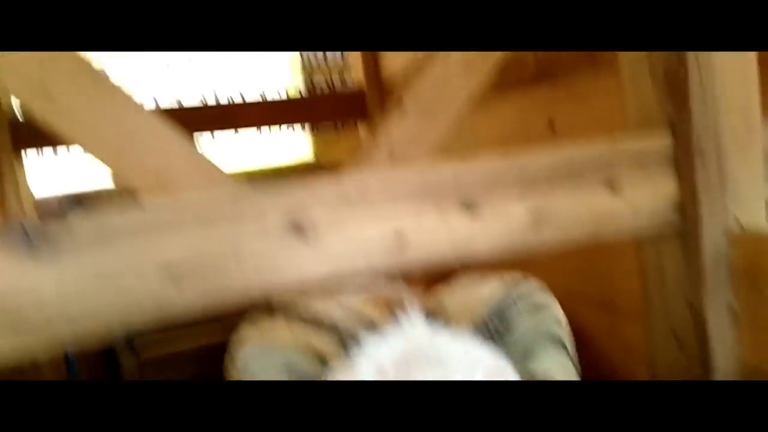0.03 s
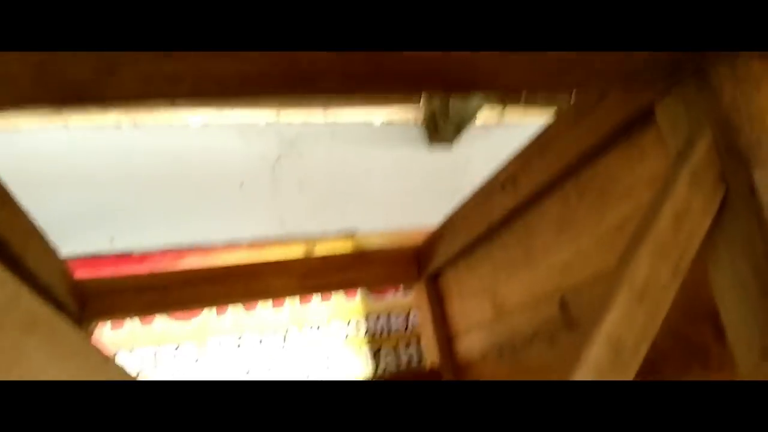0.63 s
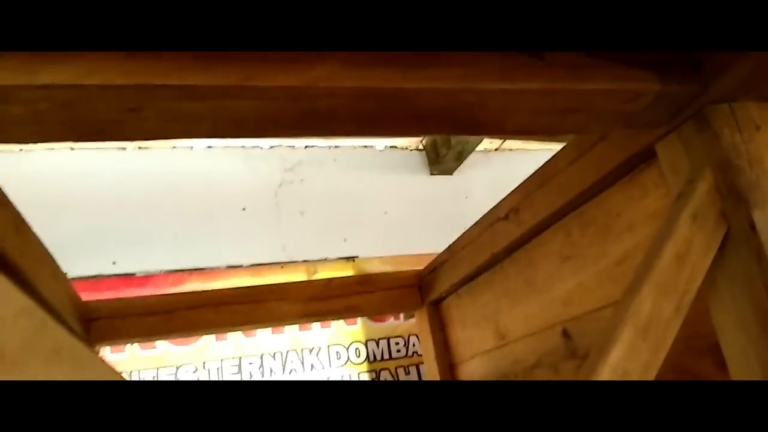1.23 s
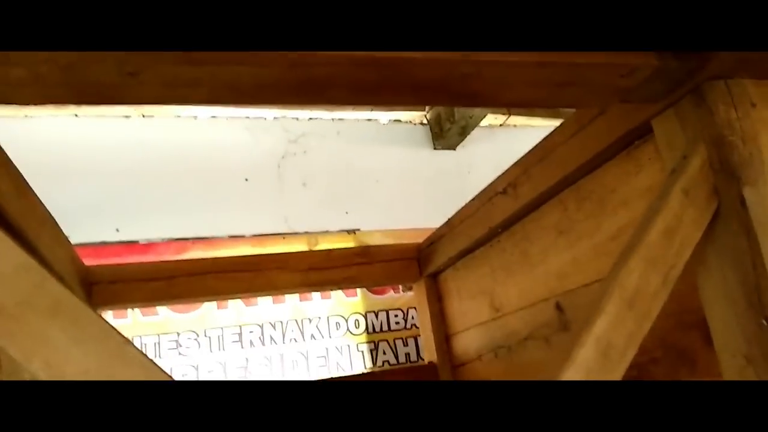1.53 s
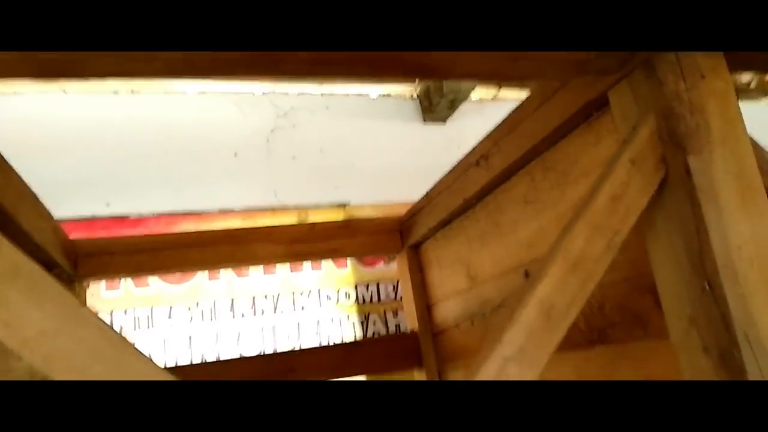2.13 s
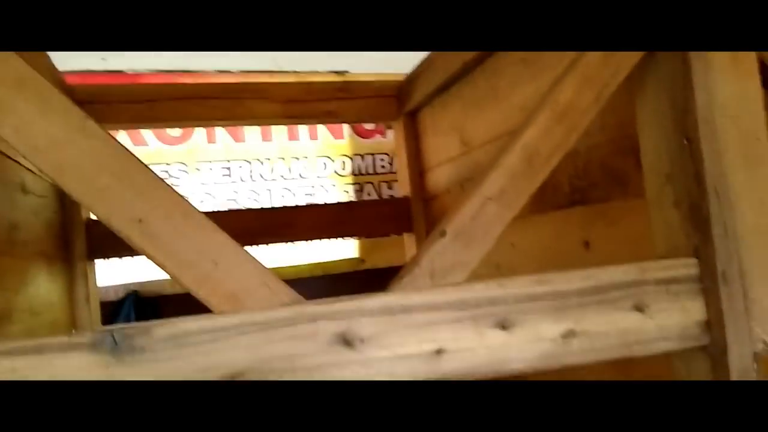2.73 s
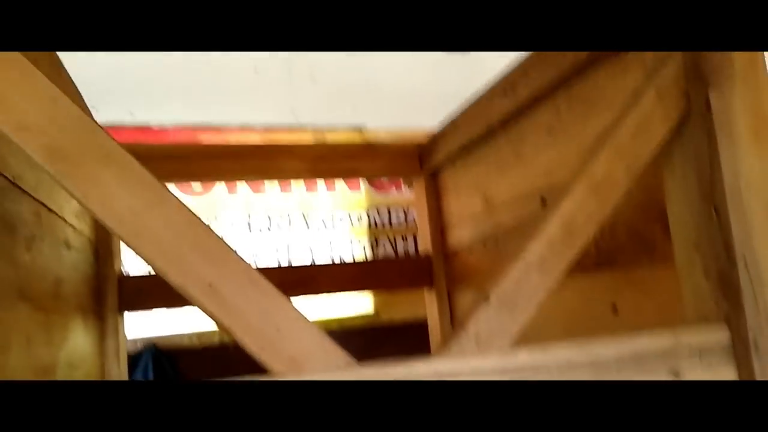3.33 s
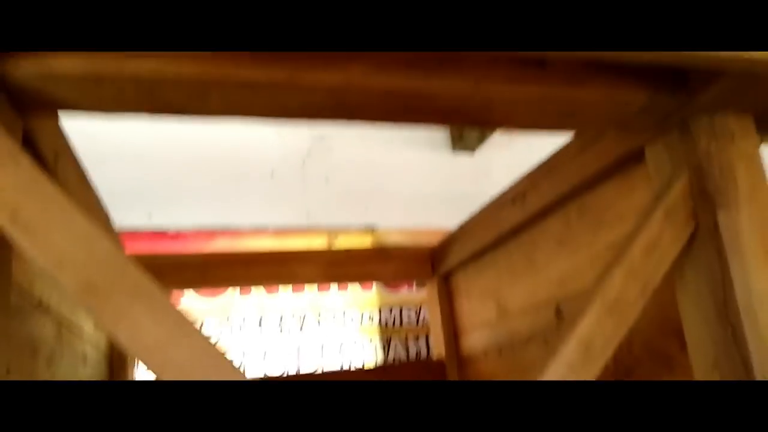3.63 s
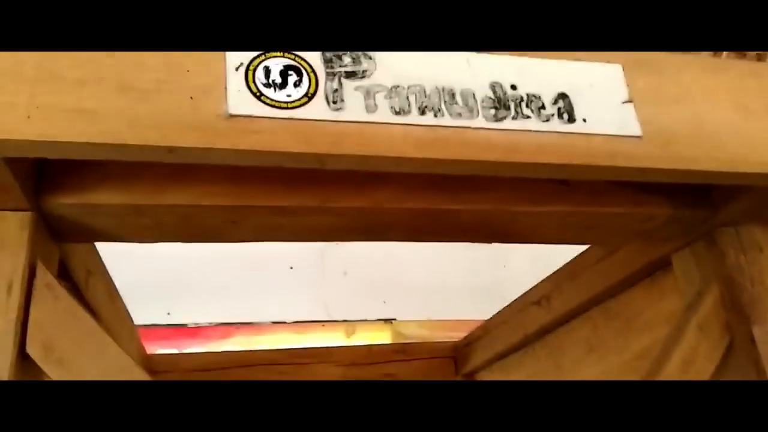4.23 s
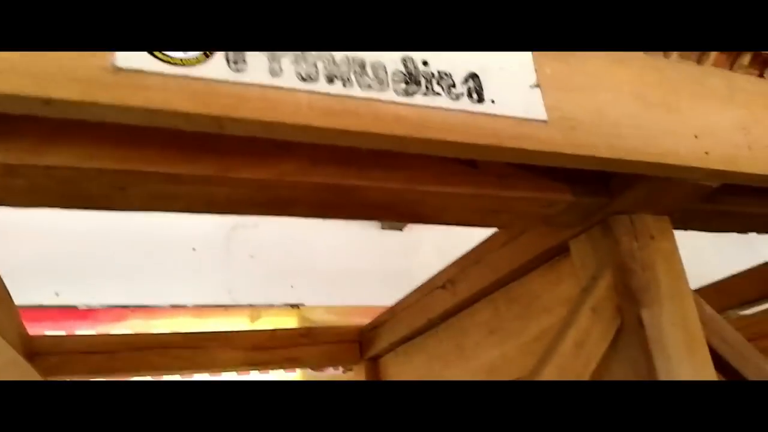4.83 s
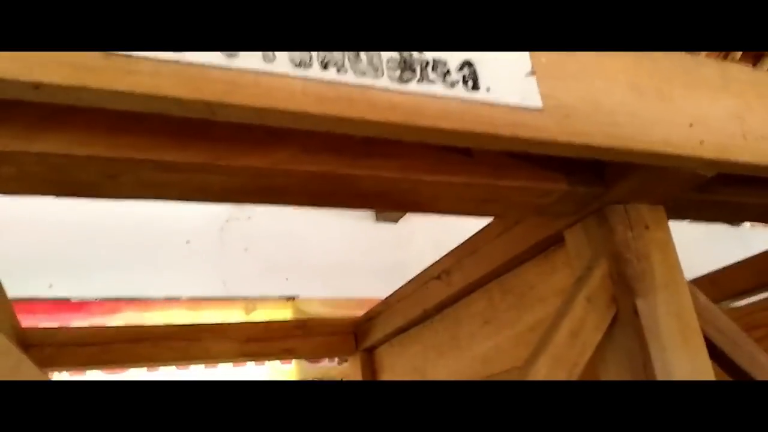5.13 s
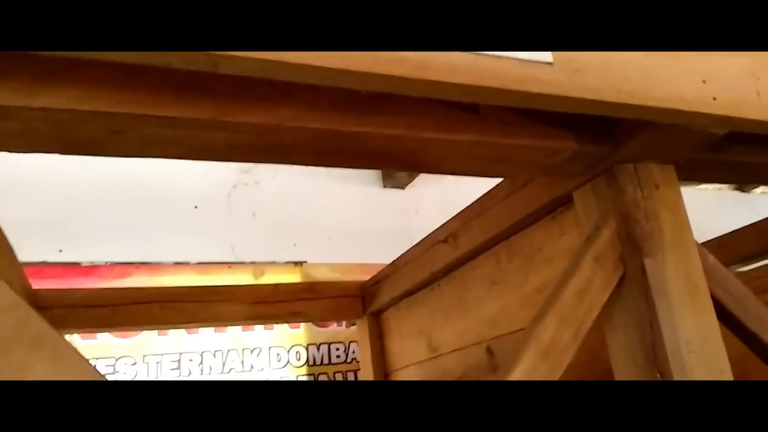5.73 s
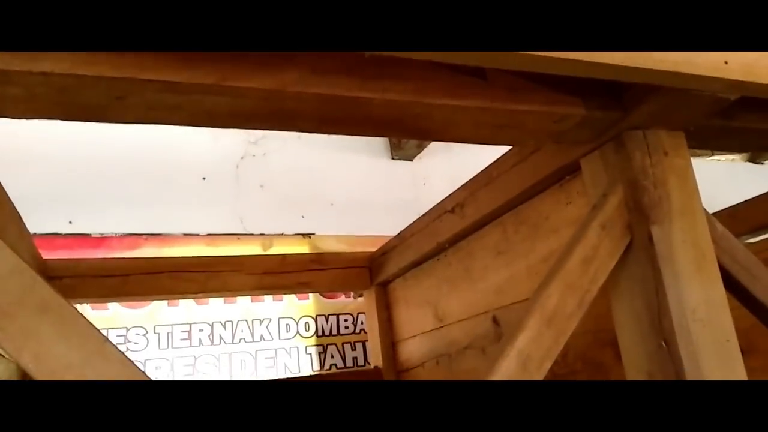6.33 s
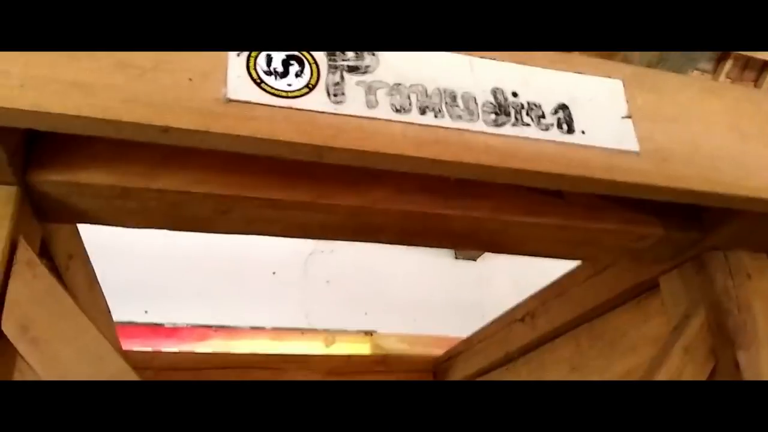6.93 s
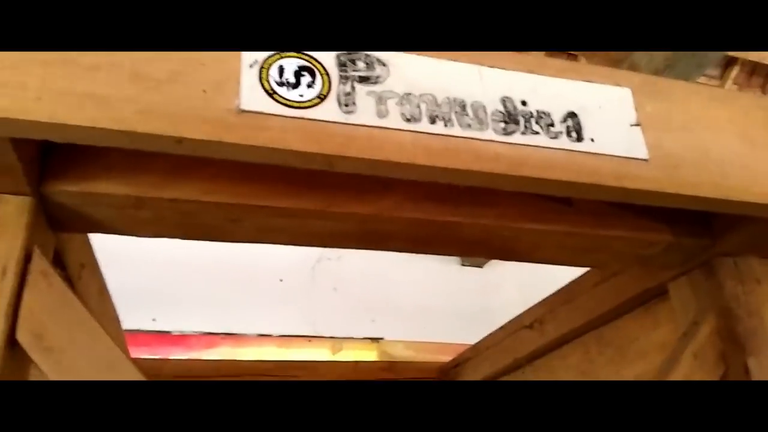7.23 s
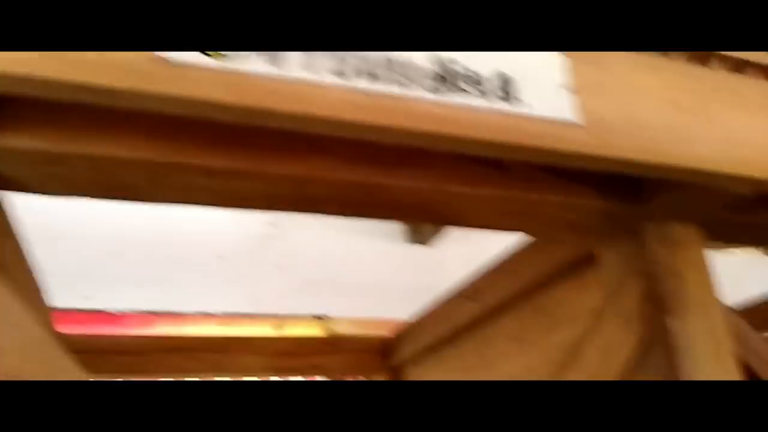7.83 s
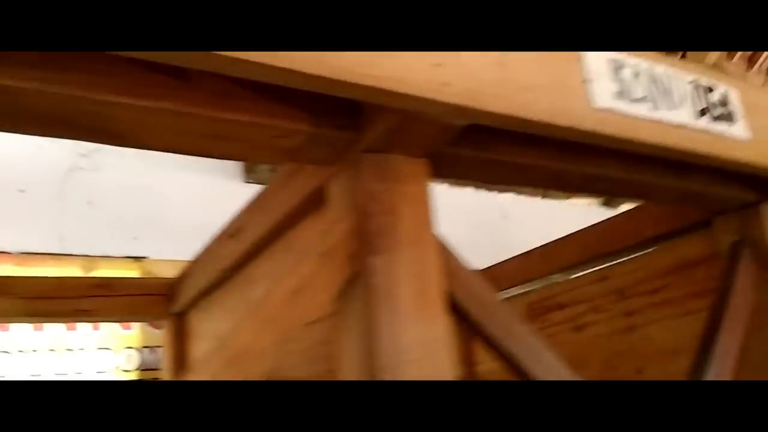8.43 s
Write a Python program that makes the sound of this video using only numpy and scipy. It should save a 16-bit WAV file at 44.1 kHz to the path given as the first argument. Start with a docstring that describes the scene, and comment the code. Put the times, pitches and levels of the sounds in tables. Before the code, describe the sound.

Dull, booming knocks ring through a wooden shed as a sheep strikes the boards of its pen close by, the loudest slightly distorted. The blows give way to softer body bumps and floor scuffs while far tyre noise and a thin shrill band swell over a steady hiss and low engine hum. After a half-second of silence near the end come more scuffs, four quick ticks and one lighter knock.

```python
"""A sheep in a wooden shed butts the plank walls of its pen at once, over far traffic, one low engine
drone and a bright, steady hiss. More blows follow in the first four seconds, the hardest overloading the
microphone; between them its flank bumps the boards and it scuffs about on the floor. Tyre rush and a thin
shrill band swell while the bumps and scuffs go on. Near 6.8 s the sound drops out for about half a second;
then come a few scuffs, four sharp ticks and a last knock."""
import sys
import numpy as np
from scipy import signal
from scipy.io import wavfile

SR = 44100
rng = np.random.default_rng(int(sys.argv[2]) if len(sys.argv) > 2 else 0)


def generate_wav(sig):
    """Save sig (samples, or channels by samples) to the path in sys.argv[1] as 16-bit PCM at SR."""
    pcm = np.round(np.clip(np.atleast_2d(sig).T, -1, 1) * 32767).astype(np.int16)
    wavfile.write(sys.argv[1], SR, pcm)


N = 378378
TIME = np.arange(N) / SR


# hard knocks of head and hoof on the pen: (time [s], level [dB], contact cutoff [Hz],
# board note [Hz], relative note level [dB], bass gain [dB])
KNOCKS = [(0.000, -4.5, 1100, 407, 5, 5), (1.241, 0, 1650, 400, -1.5, 0.5),
          (2.014, -26, 4550, 1200, 0, -10), (2.069, -21, 1000, 222, 3, 6),
          (2.276, -19, 2110, 908, 13.5, -0.5), (2.322, -11, 1510, 635, 2, 4),
          (2.419, -2.5, 1600, 578, -1.5, 6.5), (2.431, -2, 2115, 199.2, -6, -1.5),
          (3.546, 0, 1650, 349, 0.5, 3), (4.318, -14.5, 1690, 128, 0, -5),
          (8.156, -12.5, 1080, 440, 4.5, -4), (8.160, -16.5, 1000, 267, 8, -1)]
# soft bumps of the flank: (time [s], level [dB], board note [Hz])
BUMPS = [(0.203, -18, 127), (1.035, -24, 286), (1.203, -14.5, 327), (1.598, -23, 118), (3.385, -21, 135.7),
         (4.289, -20, 186), (4.775, -21.5, 117.6), (4.907, -27.5, 104.6), (5.091, -26.5, 86),
         (6.028, -22, 105), (7.373, -25, 124)]
def blows(boom_db=-1.5, crack_db=3.5, bass_hz=220, give_share=.45, give_s=.02):
    """Impact excitation: a blow rings board, pen and shed; the softer the contact, the less treble."""
    out, t = np.zeros(N), TIME[:SR]
    # fleece cushions a bump: low cutoff, more bass, and mostly the note of the one board it touches
    contacts = KNOCKS + [(s, db, 382, note_hz, 7.5, 4.5) for s, db, note_hz in BUMPS]
    for contact, boom in zip(contacts, shed_booms(t, len(contacts))):
        s, level_db, cutoff_hz, note_hz, note_db, bass_db = contact
        force = from_db(level_db)
        # a lighter blow wakes less of the whole pen, and its crack stands out more
        pen = from_db(.28 * level_db) * pen_ring(t)
        crack = from_db(crack_db - .16 * level_db) * plank_crack(t)
        body = butter(from_db(boom_db) * boom + pen + crack, cutoff_hz, "low", order=3)
        body += (from_db(bass_db) - 1) * butter(body, bass_hz, "low", order=1)
        board = from_db(note_db) * struck_board(t, note_hz, force)
        give = 1 - give_share * force * np.exp(-t / give_s)   # the wall yields, holding back the onset
        add(out, s, force * give * (body - board))
    return out


def struck_board(t, hz, force, full_force_cycles=135, overtone_ratio=1.5, overtone_db=-15.5):
    """Damped free vibration: a note and an inharmonic overtone ring longer after a harder blow."""
    t60 = full_force_cycles * force ** .55 / hz
    phase = 2 * np.pi * hz * t
    tone = np.sin(phase) + from_db(overtone_db) * np.sin(overtone_ratio * phase)
    return tone * build_up(t, hz, cycles=1) * fade(t, t60)


def plank_crack(t):
    """Impact transient: the plank strikes its frame in a brief burst of band-limited noise."""
    burst = resonance(rng.standard_normal(len(t)), hz=750, width_hz=700)
    return rms_one(burst) * fade(t, t60=.035)


# modes of the plank walls and frame: (frequency [Hz], relative level [dB], decay time T60 [s])
PEN_MODES = [(70.3, -19, 0.72), (86.2, -21, 0.95), (110.7, -23.5, 0.37), (119.4, -14, 0.94),
             (136.8, -13.5, 0.9), (198.7, -19.5, 0.76), (213, -19.5, 0.94), (236, -19.5, 0.75),
             (287.7, -18, .6), (345.6, -14.5, 0.68), (374.3, -5.5, 0.31), (402.4, -9.5, 0.67),
             (426.8, -2.5, 0.26), (534, -9.5, 0.26), (567, -14.5, 0.6), (718, -12, .4), (843, -6.5, 0.21),
             (992, -12.5, 0.47), (1122, -16.5, 0.62), (1426, -14.5, .33)]
def pen_ring(t, scatter_db=.5):
    """Modal superposition: the pen rings as a sum of damped sines, weighted a little anew each blow."""
    hz, level_db, t60 = np.array(PEN_MODES).T[:, :, None]
    modes = from_db(level_db) * np.sin(2 * np.pi * hz * t) * build_up(t, hz) * fade(t, t60)
    signs = (-1) ** np.arange(len(modes))
    weights = signs * from_db(scatter_db * rng.standard_normal(len(modes)))
    return weights @ modes


# dense ring of boards and shed: (frequency [Hz], relative spectral density [dB])
BOOM_SPECTRUM = [(30, -20), (60, -15.5), (120, 3.5), (170, -5), (260, -3.5), (400, -4), (650, -4),
                 (1000, -7), (1700, -12.5), (3000, -10.5), (6000, -12), (12000, -25.5)]
# reverberation of the shed: (frequency [Hz], decay time T60 [s])
SHED_DECAY = [(60, 1.5), (160, 0.44), (420, 1.03), (1100, 0.48), (2900, 0.37), (12000, 0.29)]
def shed_booms(t, count, board_t60=.37, tail_db=-5):
    """Modal overlap: dense modes merge into decaying noise, in which the shed outlasts the boards."""
    centres, bands = noise_bands(BOOM_SPECTRUM)
    hz = centres[:, None]
    tail = from_db(tail_db) * fade(t, at_hz(SHED_DECAY, hz))
    envelopes = build_up(t, hz) * (fade(t, board_t60) + tail)
    for _ in range(count):
        start = rng.integers(0, N - len(t))
        yield (bands[:, start:start + len(t)] * envelopes).sum(0)


# hoof and fleece scuffs: (time [s], level [dB], upper edge of the rasp [Hz])
SCUFFS = [(0.438, -26.5, 4250), (1.79, -34.5, 13100), (2.012, -24.5, 5200), (2.067, -22.5, 4500),
          (2.327, -25.5, 3500), (2.424, -23.5, 14000), (2.857, -27, 5760), (3.549, -31.5, 11080),
          (4.06, -29, 2500), (4.308, -26, 2470), (4.567, -32, 2190), (5.394, -26.5, 3600),
          (5.849, -36, 2400), (6.375, -28.5, 2260), (6.536, -33.5, 2980), (7.41, -30, 2700),
          (7.62, -31.5, 3300), (7.86, -32, 3620)]
def scuffs(slips_per_s=1200, rise_s=.0015, slide_s=.048, low_hz=1350, floor_db=-4.5, room_db=-1):
    """Stick-slip friction: a slide is a burst of tiny slips on the floorboards, smeared by the shed."""
    out, t = np.zeros(N), TIME[:SR // 2]
    for s, level_db, top_hz in SCUFFS:
        slipping = rng.random(len(t)) < slips_per_s / SR
        slips = rms_one(slipping * rng.standard_normal(len(t)))
        stroke = slips * (1 - np.exp(-t / rise_s)) * np.exp(-(t / slide_s) ** 2)
        rasp = butter(stroke, [low_hz, top_hz], "band", order=3)
        rasp = butter(rasp, np.sqrt(low_hz * top_hz), "low", order=1)
        floorboards = from_db(floor_db) * resonance(stroke, hz=850, width_hz=600)
        direct = rasp - floorboards
        echoes = rng.standard_normal(len(t)) * fade(t, t60=.35)
        reverb = signal.fftconvolve(direct, echoes / np.linalg.norm(echoes))[:len(t)]
        heard = direct + from_db(room_db) * reverb
        add(out, s, from_db(level_db) * heard / np.std(heard[:round(slide_s * SR)]))
    return out


# small sharp ticks by the microphone: (time [s], relative level [dB])
TICKS = [(7.8618, -23), (7.8732, -21), (7.8843, -28), (7.8917, -22)]
def ticks():
    """Heavy damping: tiny contacts excite a bright resonance that dies within milliseconds."""
    out, t = np.zeros(N), TIME[:SR // 20]
    for s, level_db in TICKS:
        contact = rng.standard_normal(len(t)) * fade(t, t60=.0072)
        tick = resonance(contact, hz=9200, width_hz=2500)
        add(out, s, 2 * from_db(level_db) * tick / np.abs(tick).max())
    return out


# distant engine: (time [s], firing rate [Hz], level [dB])
ENGINE = [(0, 68.1, -36), (1.5, 66, -42.5), (2.0, 72.15, -30), (2.7, 76.2, -30), (3.25, 69, -34),
          (3.8, 69.95, -30), (4.4, 73.7, -28), (5.4, 80.7, -40), (5.72, 83.1, -27), (6.45, 85.4, -34.5),
          (6.75, 88, -30), (7.4, 71.74, -38), (8.58, 71, -41)]
def engine(wobble=.011, waver_db=1.2, octave_db=-15.5):
    """Periodic excitation: the firing rate sets a wavering fundamental and its second harmonic."""
    firing_hz, level_db = in_time(ENGINE)
    phase = 2 * np.pi * np.cumsum(firing_hz * (1 + wobble * drift(11))) / SR
    drone = np.sqrt(2) * (np.sin(phase) + from_db(octave_db) * np.sin(2 * phase))
    return from_db(level_db + waver_db * drift(12)) * drone


# tyre rush: (frequency [Hz], relative spectral density [dB])
TYRE_SPECTRUM = [(300, 1), (900, -2), (1400, 1), (2200, 5), (3200, -11), (6000, -28.5)]
# its swell: (start [s], rise [s], end of hold [s], fall [s], held gain [dB], depth [dB])
TYRE_SWELL = (3, 0.84, 6.5, 0.5, -34, 14.5)
def tyre_rush(top_hz=2800):
    """Rolling noise: tyres on the far road make a broadband rush that swells once."""
    rush = butter(wash(TYRE_SPECTRUM, patchy_db=3), top_hz, "low", order=6)
    return from_db(swell(*TYRE_SWELL)) * rush


# far traffic: (frequency [Hz], relative spectral density [dB])
ROAR_SPECTRUM = [(25, -34.5), (40, -15.5), (60, 2), (90, 2.5), (140, -.5), (260, 0), (420, -2), (700, -4.5),
                 (1200, -10), (2200, -17.5), (3600, -23), (5500, -33), (9000, -47.5)]
def road_roar(level_db=-26):
    """Incoherent summation: distant traffic blends into a steady low roar."""
    return from_db(level_db) * wash(ROAR_SPECTRUM, patchy_db=1.5)


# steady hiss: (time [s], level [dB])
HISS_LEVEL = [(0, -35), (2.7, -36.5), (3.3, -37), (6.7, -37.2), (7.4, -36.5)]
# shrill band in it: (start [s], rise [s], end of hold [s], fall [s], held level [dB], depth [dB])
SHRILL_SWELL = (1.5, 2.6, 7, 0.0071, -48, 13.5)
def hiss(flicker_db=1.5, side_db=-4.8, mono_below_hz=5000):
    """Interaural decorrelation: white hiss and a faint shrill band differ between the ears at the top."""
    level_db, = in_time(HISS_LEVEL)
    white = rng.standard_normal((2, 2, N))
    even = from_db(level_db + flicker_db * drift(30)) * white[0]
    shrill = from_db(swell(*SHRILL_SWELL)) * rms_one(resonance(white[1], hz=6650, width_hz=700))
    mid, side = even + shrill
    side = from_db(side_db) * butter(side, mono_below_hz, "high", order=6)
    return np.array([mid + side, mid - side])


def from_db(db):
    """Decibels to amplitude ratio."""
    return 10 ** (np.asarray(db) / 20)


def rms_one(x):
    """Normalisation to unit rms."""
    return x / np.sqrt(np.mean(x ** 2) + 1e-20)


def in_time(rows):
    """Linear interpolation of each column of a curve at every sample."""
    s, *columns = np.transpose(rows)
    return [np.interp(TIME, s, column) for column in columns]


def at_hz(points, hz):
    """Interpolation on a log-frequency axis."""
    known_hz, values = np.transpose(points)
    return np.interp(np.log(hz), np.log(known_hz), values)


def butter(x, hz, kind, order=2):
    """Causal Butterworth filter."""
    sections = signal.butter(order, np.clip(hz, 10, .45 * SR), kind, fs=SR, output="sos")
    return signal.sosfilt(sections, x)


def resonance(x, hz, width_hz):
    """Two-pole resonator with unit gain at its peak."""
    radius = np.exp(-np.pi * width_hz / SR)
    feedback = [1, -2 * radius * np.cos(2 * np.pi * hz / SR), radius ** 2]
    return signal.lfilter(np.array([1, 0, -1]) * (1 - radius ** 2) / 2, feedback, x)


def drift(knots_per_s):
    """Slow random modulation with a spread near 1."""
    knots = rng.standard_normal(2000)
    return np.interp(TIME * knots_per_s, np.arange(len(knots)), knots)


def build_up(t, hz, cycles=.72):
    """Onset transient: low notes take longer to spread through the wood."""
    return 1 - np.exp(-t * hz / cycles)


def fade(t, t60):
    """Exponential decay by 60 dB in t60 seconds."""
    return np.exp(-np.log(1000) * t / t60)


def swell(start, rise_s, end, fall_s, held_db, depth_db):
    """Trapezoidal envelope in dB: a rise, a hold and a fall."""
    up = np.clip(np.minimum((TIME - start) / rise_s, 1 - (TIME - end) / fall_s), 0, 1)
    return held_db - depth_db * (1 - up)


def add(out, s, sound):
    """Superpose a sound at s seconds."""
    start = round(s * SR)
    out[start:start + len(sound)] += sound[:N - start]


def noise_bands(spectrum):
    """Half-octave noise bands that sum to unit rms: their centres and their signals."""
    edges = 22 * 2 ** (np.arange(20) / 2)
    centres = np.sqrt(edges[1:] * edges[:-1])
    white = rng.standard_normal((2, N))
    bands = np.array([butter(white[k % 2], edges[k:k + 2], "band") for k in range(len(centres))])
    bands *= from_db(at_hz(spectrum, centres))[:, None]
    return centres, bands / np.std(bands.sum(0))


def wash(spectrum, patchy_db):
    """Amplitude modulation: each band of a distant noise swells a little on its own."""
    _, bands = noise_bands(spectrum)
    return sum(band * from_db(patchy_db * drift(9.9)) for band in bands)


def scene():
    """Superposition: the pen and the road sit in the middle; only the hiss has width."""
    return blows() + scuffs() + ticks() + engine() + tyre_rush() + road_roar() + hiss()


# silent gap: (start [s], end [s])
DROPOUT = (6.783, 7.373)
def record(dry, peak_db=13.5, rolloff_hz=12300, cutoff_hz=14200):
    """Saturation flattens loud peaks; a treble resonance, one dropout and a steep low-pass follow."""
    clipped = dry / (1 + dry ** 16) ** (1 / 16)
    treble = from_db(peak_db) * resonance(clipped, hz=10420, width_hz=1300)
    coloured = butter(clipped + treble, rolloff_hz, "low", order=3)
    live = (TIME < DROPOUT[0]) | (TIME > DROPOUT[1])
    low_pass = signal.ellip(10, .1, 70, cutoff_hz, fs=SR, output="sos")
    return signal.sosfilt(low_pass, coloured * live + 1e-18)


dry = scene()
out = record(dry)
generate_wav(out)
```